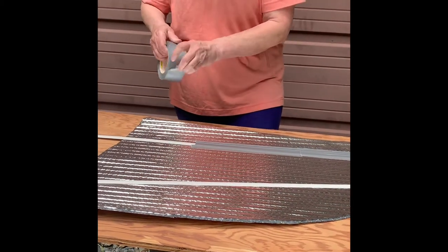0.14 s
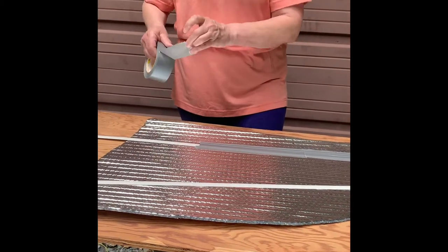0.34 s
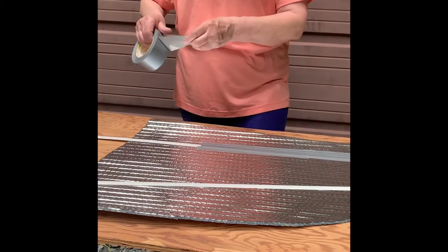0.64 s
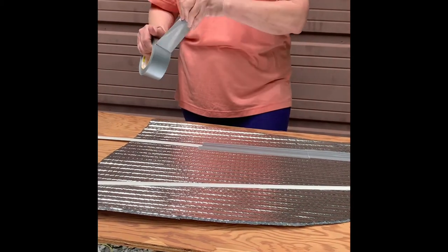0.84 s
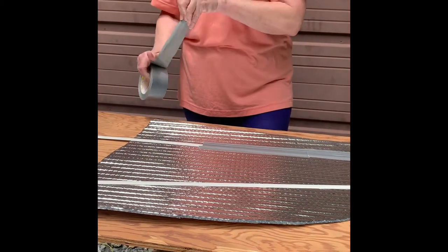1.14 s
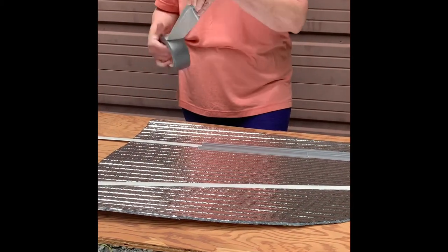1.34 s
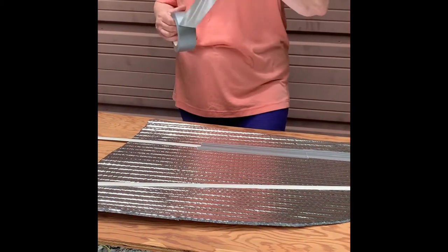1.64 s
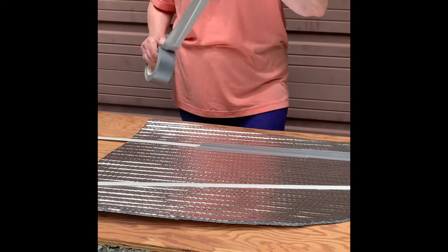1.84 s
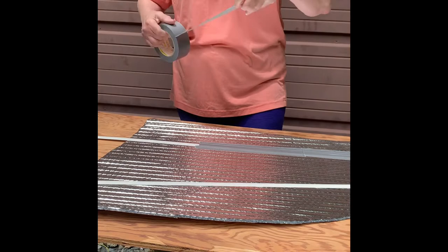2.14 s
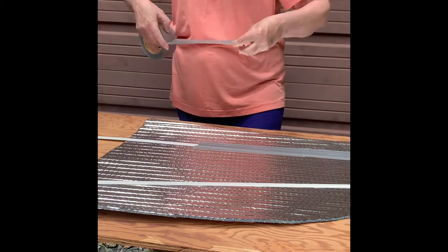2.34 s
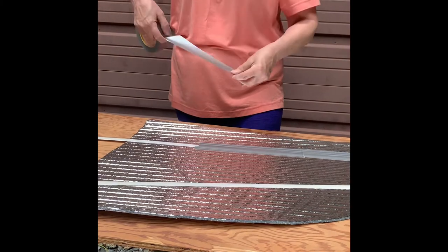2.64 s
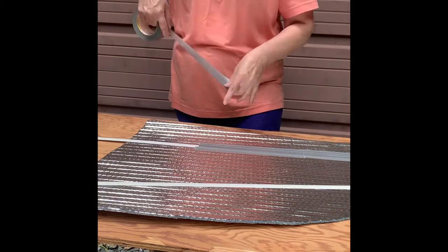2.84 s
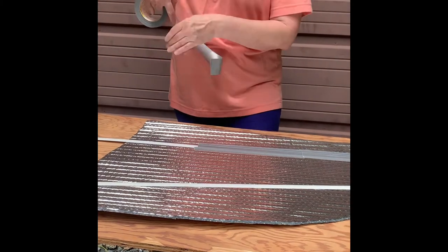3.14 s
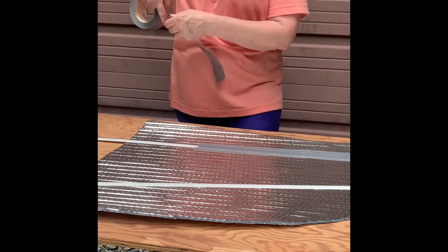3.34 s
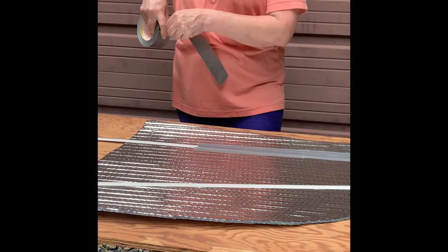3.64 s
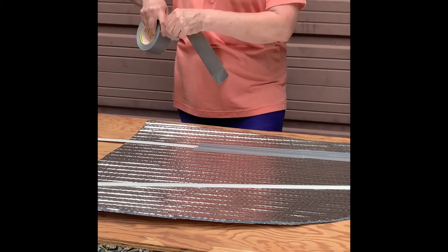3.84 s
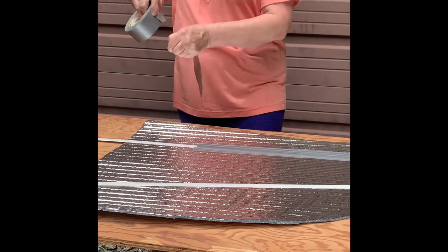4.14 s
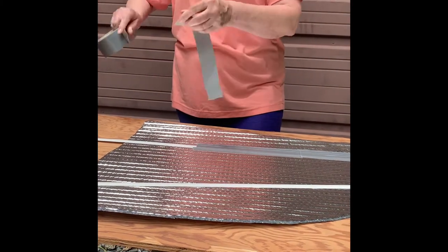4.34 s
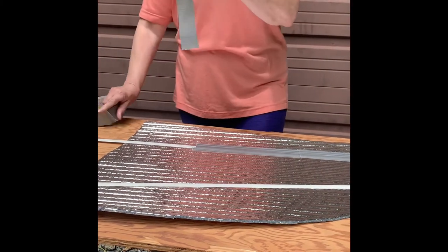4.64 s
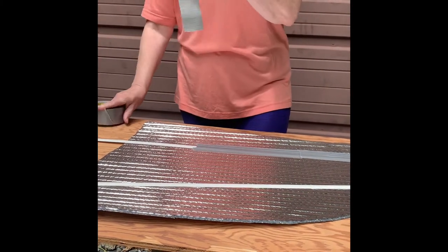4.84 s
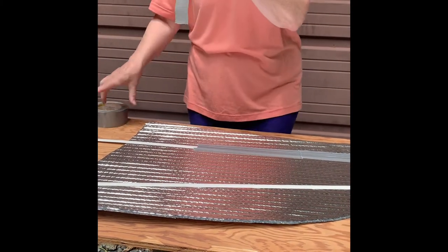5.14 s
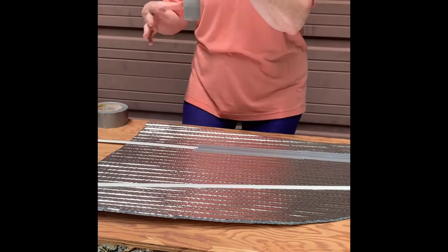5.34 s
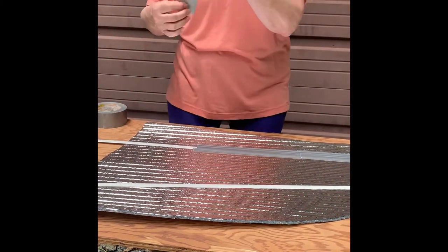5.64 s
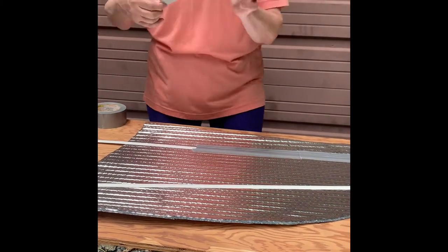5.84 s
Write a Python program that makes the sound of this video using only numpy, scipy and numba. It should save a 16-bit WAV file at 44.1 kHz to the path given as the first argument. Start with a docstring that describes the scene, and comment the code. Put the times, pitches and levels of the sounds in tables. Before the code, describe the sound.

At a table before a wall, a short tape pull is followed by two louder, very brief rips that crack as the strip snaps taut. After quiet handling and tiny crisp pops, the tape is torn across in a fraction of a second. The cardboard roll lands on wood with a low hollow knock, rocks and scuffs, then sticky film crackles softly. Close, fairly dry stereo, with faint low hum throughout.

```python
"""Duct tape off the roll

Close to a stereo pair, tape is jerked off its roll in three short pulls, crinkles in the fingers and is torn
across: stick-slip cracks through moving resonances. The roll is put down on a wooden table in front of a wall
and rocks before it settles: low-passed pushes drive the modes of wood and cardboard.
Far off, a motor hums throughout as a few harmonics, and faint high notes ring as wavering sines."""
import sys
import numpy as np
from scipy import signal
from scipy.fft import rfft, irfft, next_fast_len
from scipy.io import wavfile
from scipy.ndimage import uniform_filter1d
from numba import njit

SR = 44100
rng = np.random.default_rng(int(sys.argv[2]) if len(sys.argv) > 2 else 0)


def inscribe(sig):
    """Save sig as 16-bit PCM at rate SR to the path in sys.argv[1].

    A 1-D sig is mono; a 2-D sig holds one channel per row.
    Samples are clipped to [-1, 1] before scaling.
    """
    pcm = np.round(np.clip(np.atleast_2d(sig).T, -1, 1) * 32767)
    wavfile.write(sys.argv[1], SR, pcm.astype(np.int16))


N = 264159
TIME = np.arange(N) / SR

# All levels are relative within their layer; layer gains follow in the functions.
# Every ..._COLOUR is a noise spectrum: [f/Hz, density/dB per Hz]

# DISTANT: air ahead of the pair, and ambience from all around
AIR_COLOUR = [(20, -21), (60, -2.5), (110, 3), (170, -1.5), (300, -12), (600, -11), (1000, -14),
              (2000, -33), (4000, -36.5), (8000, -39.5), (14500, -46.5), (16000, -57)]
AMBIENT_COLOUR = [(100, -2), (300, -3), (700, 2), (1100, -1), (2000, -16.5), (3500, -24), (5500, -46)]
# the far motor's fundamental: [t/s, f/Hz]
MOTOR_PITCH = [(0.0, 102.5), (0.43, 103), (0.98, 108), (1.27, 108.5), (1.59, 99), (1.78, 101), (1.92, 96),
               (3.15, 101), (3.31, 100.0), (4.5, 102.5), (5.4, 109), (5.99, 108.5)]
# its swell: [t/s, level/dB]
MOTOR_SWELL = [(0, -4.5), (1.2, -0.5), (2, -3), (3.9, 0), (4.5, 3.5), (5.99, 0.5)]
# its harmonics: [multiple of the fundamental, level/dB]
MOTOR_ORDERS = [(1, -57), (2, -68.5), (3, -70.5)]
# far ringing notes: [start t/s, hold/s, f/Hz, level/dB, pitch wobble as a share]
FAR_NOTES = [(3.613, 0.36, 2406, -76.5, 0.005), (3.748, 0.14, 2023, -68, 0.003),
             (3.869, 0.15, 3440, -67, .003), (3.982, 0.18, 3050, -67, 0.004)]
NOTE_ATTACK_S, NOTE_FADE_DB_PER_S = 0.028, 111

# CLOSE, hands: fingers slide over the tape: [peak t/s, rise/s, fall/s, level/dB]
FINGER_STROKES = [(0.013, 0.086, 0.17, -64), (0.568, 0.074, 0.097, -66), (0.997, 0.029, 0.099, -65),
                  (2.672, 0.022, 0.15, -62), (2.749, 0.048, 0.068, -68), (3.357, 0.019, 0.031, -67.5),
                  (4.262, 0.034, 0.022, -49), (4.899, 0.064, 0.059, -57), (5.247, 0.05, 0.082, -59),
                  (5.608, 0.047, 0.059, -56.5), (5.64, 0.016, 0.1, -56.5), (5.742, 0.015, 0.035, -46.5),
                  (5.875, 0.29, 0.22, -64)]
FINGER_COLOUR = [(500, 0.5), (1500, -9.5), (3500, 5.5), (6500, -2.5), (9000, -7), (12000, -7),
                 (16000, -9.5)]
# hands and sleeves rub: [peak t/s, rise/s, fall/s, level/dB]
SLEEVE_STROKES = [(.02, 0.38, 0.42, -65.5), (.37, 0.21, 0.34, -61), (.64, 0.31, 0.6, -59),
                  (4.55, 0.93, 3.06, -64.5), (5.88, 0.57, 0.36, -61.5)]
RUB_COLOUR = [(100, -17), (300, 5.5), (700, 8), (1700, 4), (2600, -12.5), (5000, -26)]
# soft treble swishes: [peak t/s, rise/s, fall/s, level/dB]
SWISHES = [(1.28, 0.37, 0.33, -69), (1.425, 0.047, 0.039, -72.5), (1.99, .2, .25, -78),
           (2.2, 0.11, .16, -71.5)]
SWISH_COLOUR = [(2000, -20), (4000, -7.5), (6500, -2.5), (11000, -1), (15000, 3.5)]

# CLOSE, tape: a gentle pull off the roll and two hard ones:
# [t/s, length/s, attack/s, level/dB, sag/dB, final jerk/dB, top slip rate/(1/s), final resonance f/Hz]
PULLS = [(0.12, 0.087, 0.022, -28, 10.5, -4, 650, 2100), (1.014, 0.043, .012, -28.5, 7, 7.5, 786, 2340),
         (1.6894, .057, .008, -27.5, 12, 14.5, 800, 7500)]
GENTLE_COLOUR = [(150, -11), (350, -5.5), (550, 4), (850, 5.5), (1300, -8), (1900, 3.5), (3000, 3),
                 (6000, 4), (9000, 0), (12000, -0.5), (16000, -1)]
PULL_COLOUR = [(80, -22), (250, 1), (550, -2.5), (900, -9), (1400, -0.5), (2100, -2), (3500, 4),
               (5000, -4.5), (8500, -3), (11000, -6), (16000, -5)]
GRAB_S, GRAB_BELOW_DB = 0.0044, 6.5  # the glue starts to part at once, a little under the full level
JERK_S, RELEASE_S, RELEASE_DB = 0.016, 0.003, 21.5  # the strip comes taut, then the peeling stops
START_SPEED, JERK_SPEED = 0.4, 0.6  # shares of the top slip rate
SLACK_HZ, RESONANCE_HZ_PER_SLIP_RATE = 1300, 3.2  # the resonance climbs with the peeling speed
BOOM_START_HZ, BOOM_END_HZ, BOOM_GLIDE_S = 720, 490, 0.019  # lower as the freed strip lengthens
BOOM_DB, BOOM_RISE_S, BOOM_FALL_S = 12, 0.04, 0.022
# cracks as the glue lets go and the strip jerks: [t/s, level/dB, hump f/Hz]
CRACKS = [(.1177, -35.5, 4016), (.1412, -28.5, 6530), (1.011, -26, 2800), (1.0172, -24.5, 3270),
          (1.0372, -24.5, 3470), (1.0535, -20, 8000), (1.0567, -16, 2050), (1.0613, -14, 11000),
          (1.688, -25, 1400), (1.6937, -23.5, 5000), (1.7435, -27.5, 10000), (1.7471, -18.5, 8000),
          (1.7502, -16.5, 7600)]
# the strip snaps taut and twangs: [t/s, crack level/dB, hump f/Hz, twang level/dB, twang f/Hz, twang t60/s]
TAUT = [(0.206, -42, 2100, -29.5, 227, 0.096), (1.0605, -10, 2050, -23.5, 263, 0.048),
        (1.7599, -9, 2700, -28, 233, 0.03)]
SNAP_COLOUR = [(100, -20.5), (400, 4.5), (900, -5), (1400, -3), (2100, 3.5), (3500, 4.5), (5000, 5),
               (9000, -2), (12000, -2.5), (16000, -5)]
TWANG_LAG_S = 0.0017
TWANG_OVERTONE, OVERTONE_DB, OVERTONE_T60_S = 1.8, -5, 0.012  # second mode, as a multiple of the first
# fingertips tap the cardboard core: [t/s, level/dB, hump f/Hz]
TAPS = [(.52, -43, 240), (.538, -46.5, 360), (.619, -49, 354), (.9325, -48, 1393), (2.949, -52.5, 1530),
        (3.316, -56, 1550), (4.5127, -43, 1494)]
TAP_COLOUR = [(100, -13), (500, 5), (1200, 0.5), (2500, -10.5), (5000, -18), (16000, -26.5)]
# the loudest creases popping in the handled strip: [t/s, level/dB, hump f/Hz]
CRINKLES = [(.936, -64, 9000), (.9655, -61.5, 9400), (.9784, -62, 9020), (1.6437, -46.5, 5200),
            (2.668, -41.5, 12950), (2.692, -44.5, 3250), (2.7435, -54, 3420), (2.7505, -54, 3250),
            (2.756, -51, 3350), (2.7645, -51, 3960), (2.8535, -52.5, 3576), (2.877, -50, 3230),
            (2.949, -53.5, 3480), (3.054, -53, 2086), (3.103, -45, 2800), (3.316, -59.5, 2720),
            (3.3543, -61.5, 2086), (3.551, -52, 3750), (4.2635, -42.5, 9020), (4.408, -61.5, 9000),
            (4.5127, -44.5, 2576), (5.5884, -59.5, 6110), (5.5922, -53.5, 5900), (5.6042, -49, 6020),
            (5.6104, -50, 5970), (5.6345, -42, 5400), (5.6405, -55, 14500), (5.6754, -63, 11100),
            (5.6935, -54.5, 3450), (5.7359, -39, 5020), (5.7452, -41, 10700), (5.8262, -61, 2500),
            (5.9254, -55.5, 3770), (5.931, -59, 3400)]
CRINKLE_COLOUR = [(60, -23), (300, -9), (1200, 7), (2200, 0), (3500, 0.5), (6000, 1.5), (10000, -5),
                  (16000, -7)]
CREASE_ABOVE_DB, CREASE_SPREAD_DB, CREASE_HZ = 1.5, 2.5, 5244  # small creases at random around a stroke
# the tear advances in surges: [peak t/s, rise/s, fall/s, level/dB]
SURGES = [(4.0632, 0.036, 0.0024, -21.5), (4.0682, .002, 0.047, -27.5), (4.0875, 0.007, 0.012, -24),
          (4.0962, 0.006, 0.0028, -26)]
# single threads crack in the tear: [t/s, level/dB, hump f/Hz]
THREADS = [(4.0208, -39.5, 3000), (4.0352, -30, 2485), (4.0467, -26, 2500), (4.0612, -20, 6500),
           (4.0632, -12.5, 6500), (4.0673, -24.5, 12000), (4.0876, -25, 9000), (4.0906, -12, 10000),
           (4.094, -25.5, 13000), (4.0963, -18, 6440)]
TEAR_COLOUR = [(150, -15), (400, -10.5), (620, -1.5), (1200, -7.5), (2500, -7), (4000, -3), (7000, -8.5),
               (9000, -4), (11000, -8.5), (16000, -11.5)]
TEAR_START_S, TEAR_END_S, THREADS_PER_S = 4.02, 4.099, 460
TEAR_START_HZ, TEAR_END_HZ = 1982, 9700  # the resonance rises as the intact part narrows

# CLOSE, table: the roll lands, rocks and settles: [t/s, table level/dB, roll level/dB, cut-off f/Hz]
TOUCHES = [(4.5737, -19.5, -21, 3240), (4.576, -26.5, -26, 3570), (4.579, -21.5, -32, 1500),
           (4.5833, -16.5, -16.5, 745), (4.59, -17.5, -33, 168), (4.601, -25.5, -31, 300),
           (4.735, -41.5, -36.5, 1600), (4.7436, -19.5, -29, 225), (4.755, -26, -40, 201),
           (4.771, -36.5, -44, 1020), (4.78, -25, -46, 240), (4.801, -39, -44, 243),
           (4.944, -30, -44, 181.5), (5.042, -42, -36.5, 1180), (5.058, -31.5, -22, 1310),
           (5.063, -22, -38, 206), (5.0717, -27.5, -19, 1130), (5.083, -34, -37, 1180),
           (5.0945, -28, -36, 400), (5.191, -57, -44.5, 1198)]
# modes of the table top, then of the roll: [f/Hz, level/dB, t60/s]
TABLE_MODES = [(60.4, -19, 0.48), (97.3, -14, 0.53), (130.8, -10, 0.2), (165.4, -5, 0.13),
               (192.7, -10.5, 0.14), (244.3, -1.5, 0.15), (291, -14, 0.05), (396, -9.5, 0.086),
               (433, -12.5, 0.051)]
ROLL_MODES = [(533, -10, 0.098), (650, -18, 0.088), (830, -7, 0.023), (1098, -4, 0.063),
              (1296, -8.5, 0.033), (1530, -35, 0.068), (1986, -23, 0.03), (2330, -40, 0.03)]
CLATTER_COLOUR = [(30, -20), (70, -0.5), (150, 5.5), (200, -2), (260, 1.5), (400, 0.5), (560, 2), (750, -2),
                  (1150, -6.5), (1800, -8), (2800, -21.5), (8000, -38)]
KNOCK_HIGHPASS_HZ = 68.5  # the knocks are cut gently below this
# the sticky edge rasps on the wood: [t/s, level/dB]
RASPS = [(4.574, -43), (4.73, -54.5), (4.768, -58.5), (5.053, -55.5)]
GRIT_COLOUR = [(500, 1), (2500, 0.5), (4000, -0.5), (7000, -9.5), (10000, -8.5), (16000, -20)]
GRIT_LAG_S, GRIT_RISE_S, GRIT_FALL_S = 0.0048, 0.016, 0.083
# the roll scuffs under the hand: [peak t/s, rise/s, fall/s, level/dB]
SCUFFS = [(4.63, .03, 0.22, -35), (4.785, 0.095, 0.032, -34.5), (4.96, 0.12, 0.28, -46),
          (5.095, 0.28, 0.041, -37.5), (5.24, 0.16, 0.28, -67)]
SCUFF_COLOUR = [(25, -16.5), (65, 1.5), (100, 5.5), (155, -1.5), (200, 0), (250, 1), (400, -25.5),
                (900, -19), (2000, -58.5)]

# PLACE: colours of the wall's reflections, of those from the sides, and of the tail
NEAR_COLOUR = [(100, 2.5), (600, 3.5), (3000, -2.5), (7000, -4.5), (16000, -5.0)]
SIDE_COLOUR = [(140, -21.0), (290, -2.0), (550, 1), (1100, -4), (3000, -1.5), (5000, -10.0), (16000, -7.0)]
TAIL_COLOUR = [(100, -2.0), (1000, 1.5), (3000, 1.0), (6500, -0.5), (10000, -8.5), (16000, -8.5)]

# MICROPHONE: phase between the channels: [f/Hz, half turns by which left leads]
PAIR_PHASE = [(0, 0), (1500, 0), (2400, .28), (3600, .33), (4450, 1), (5100, 1), (6500, 2), (7550, 2),
              (8400, 3), (9500, 3), (10400, 4), (11600, 4), (12600, 5), (13700, 5), (14600, 6)]
CUTOFF_HZ = 15900


def from_db(db):
    """Decibels to gain."""
    return 10 ** (np.asarray(db) / 20)


def unit_energy(x):
    """Scale so that the squares sum to one."""
    return x / np.sqrt(np.sum(x ** 2) + 1e-20)


def in_time(rows):
    """Each column of a curve, interpolated at every sample."""
    s, *columns = np.transpose(rows)
    return [np.interp(TIME, np.sort(s), column) for column in columns]


def add(out, s, sound):
    """Mix a sound in at a time in seconds."""
    at = max(round(s * SR), 0)
    out[at:at + len(sound)] += sound[:N - at]


def colour(x, spectrum, peak_hz=1000, peak_db=0, size=4096):
    """Causal filter with a given spectrum and a broad hump; white noise keeps its power."""
    hz, db = np.transpose(spectrum)
    octave = np.log2(np.maximum(np.fft.rfftfreq(size, 1 / SR), 10))
    hump = np.exp(-2 * (octave - np.log2(peak_hz)) ** 2)
    log_gain = np.log(from_db(np.interp(octave, np.log2(hz), db) + peak_db * hump))
    # folding the cepstrum onto positive times gives minimum phase
    cepstrum = irfft(log_gain)[:size // 2]
    cepstrum[0] = 0
    response = unit_energy(irfft(np.exp(rfft(2 * cepstrum, size))))
    return signal.oaconvolve(x, response)[:len(x)]


def drift(rate):
    """Random curve of about unit spread, rate points per second; it holds still after 4096 points."""
    return np.interp(TIME * rate, np.arange(4096), rng.standard_normal(4096))


def dying_noise(t60, size=4096):
    """A burst of noise with unit energy that falls 60 dB in t60 seconds."""
    return unit_energy(rng.standard_normal(size) * from_db(-60 * TIME[:size] / t60))


def ring(x, hz, t60):
    """A damped mode: a unit click sets a sine of height one ringing."""
    r, w = from_db(-60 / (t60 * SR)), 2 * np.pi * hz / SR
    return signal.lfilter([0, np.sin(w)], [1, -2 * r * np.cos(w), r * r], x + 1e-18)


def struck(force, modes):
    """A body answers a force with its modes, in alternating sign."""
    return sum((-1) ** k * from_db(db) * ring(force, hz, t60) for k, (hz, db, t60) in enumerate(modes))


@njit
def moving_resonance(x, hz, q):
    """Band-pass with a gliding centre and a gain of one on top."""
    out, y1, y2 = np.zeros(len(x)), 0., 0.
    for i in range(2, len(x)):
        w = 2 * np.pi * hz[i] / SR
        r = np.exp(-w / (2 * q))
        y = (1 - r * r) / 2 * (x[i] - x[i - 2]) + 2 * r * np.cos(w) * y1 - r * r * y2 + 1e-18
        out[i], y2, y1 = y, y1, y
    return out


def strokes(rows):
    """Gain of overlapping strokes; each swells by 20 dB over its rise and dies by 20 dB over its fall."""
    power = np.zeros(N)
    for s, rise, fall, db in rows:
        distance = np.maximum((s - TIME) / rise, (TIME - s) / fall)
        power += from_db(db - 20 * np.minimum(distance, 10)) ** 2
    return np.sqrt(power)


def air():
    """Steady coloured noise from ahead, its level barely drifting."""
    return from_db(-58.0 + 0.27 * drift(2.9)) * colour(rng.standard_normal(N), AIR_COLOUR)


def ambience():
    """Coloured noise, opposed in the two channels so that it surrounds the pair."""
    return from_db(-64.5) * colour(rng.standard_normal(N), AMBIENT_COLOUR) * [[1], [-1]]


def motor(waver_db, wobble):
    """A far engine whose speed wanders and whose harmonics fade in and out."""
    hz = in_time(MOTOR_PITCH)[0] * (1 + wobble * drift(12))
    phase = 2 * np.pi * np.cumsum(hz) / SR
    swell_db = in_time(MOTOR_SWELL)[0]
    hum = np.zeros(N)
    for multiple, db in MOTOR_ORDERS:
        level_db = db + swell_db + waver_db * drift(5.6)
        hum += from_db(level_db) * np.sqrt(2) * np.sin(multiple * phase)
    return hum


def friction(rows, spectrum, grain_db, grains_per_s, clump_db=-3.5):
    """Sliding contact that catches and lets go in grains, which come in clumps."""
    grain_level_db = grain_db * drift(grains_per_s) + clump_db * drift(grains_per_s / 10)
    grains = from_db(grain_level_db) * rng.standard_normal(N)
    return strokes(rows) * colour(grains / grains.std(), spectrum)


def hands():
    """Grainy friction of fingers on tape, of hands and sleeves, and soft swishes."""
    out = friction(FINGER_STROKES, FINGER_COLOUR, grain_db=6.5, grains_per_s=1100, clump_db=3.0)
    out += friction(SLEEVE_STROKES, RUB_COLOUR, grain_db=4.0, grains_per_s=210, clump_db=-0.66)
    return out + friction(SWISHES, SWISH_COLOUR, grain_db=2.0, grains_per_s=450, clump_db=2.0)


def rip(course, spectrum, jitter, uneven_db, slip_t60, fizz, crack, resonance, q, wander, count=4):
    """Stick and slip: each jump of the ripping edge is a tiny crack, over the fizz of parting glue strands."""
    level_db, rate, hz, sounding = course
    cycle = np.floor(np.cumsum(rate * np.exp(jitter * drift(400))) / SR)
    unevenness = np.clip(rng.standard_normal(N), -2, 2)
    slips = np.diff(cycle, prepend=0) * from_db(2 * uneven_db * unevenness)
    slips /= np.abs(uniform_filter1d(slips, size=600)) + 1e-9  # mean power of one
    fade = from_db(-120 / (slip_t60 * SR))  # a power, so 60 dB in t60
    spray = signal.lfilter([1 - fade], [1, -fade], slips + 1e-18)
    cracks = crack * np.sqrt(slips) + np.sqrt(spray + fizz ** 2) * rng.standard_normal(N)
    cracks = colour(cracks, spectrum) * from_db(level_db) * sounding
    out = cracks + resonance * moving_resonance(cracks, hz, q)
    for centre in np.geomspace(1800, 9000, num=count):  # sharp creases ring and wander as the strip flexes
        crease_hz = centre * np.exp(wander * np.clip(drift(50), -2, 2))
        out += 2 * moving_resonance(cracks, crease_hz, 16.0)
    return out


def pull_course(s, length, attack, db, sag_db, jerk_db, rate, final_hz):
    """A pull grabs, speeds up, sags in level and ends in a jerk: level/dB, slips per s, f/Hz, sounding."""
    end, running_hz = s + length, RESONANCE_HZ_PER_SLIP_RATE * rate
    start_rate, jerk_rate = START_SPEED * rate, JERK_SPEED * rate
    low_db = db - sag_db
    curves = in_time([(s, db - RELEASE_DB, start_rate, SLACK_HZ),
                      (s + GRAB_S, db - GRAB_BELOW_DB, start_rate, SLACK_HZ),
                      (s + attack, db, jerk_rate, (SLACK_HZ + running_hz) / 2),
                      ((s + attack + end - JERK_S) / 2, db - sag_db / 2, rate, running_hz),
                      (end - JERK_S, low_db, rate, running_hz),
                      (end, low_db + jerk_db, jerk_rate, final_hz),
                      (end + RELEASE_S, low_db - RELEASE_DB, start_rate, final_hz)])
    return curves + [(TIME > s) & (TIME < end + RELEASE_S)]


def with_boom(ripping):
    """The freed strip adds a low resonance that sinks and is strongest at the height of each pull."""
    out = ripping.copy()
    for s, _, attack, *_ in PULLS:
        hz = np.interp(TIME, [s, s + BOOM_GLIDE_S], [BOOM_START_HZ, BOOM_END_HZ])
        gain = strokes([(s + attack, BOOM_RISE_S, BOOM_FALL_S, BOOM_DB)])
        out += gain * moving_resonance(ripping, hz, 3.5)
    return out


def pulls():
    """Tape peels off the roll in slips, gently once and then hard twice."""
    ripping = rip(pull_course(*PULLS[0]), GENTLE_COLOUR, jitter=0.2, uneven_db=1.0, slip_t60=0.013,
                  fizz=0.32, crack=0.13, resonance=0.87, q=2.8, wander=0.24)
    for pull in PULLS[1:]:
        ripping += rip(pull_course(*pull), PULL_COLOUR, jitter=0.26, uneven_db=2.5, slip_t60=0.004,
                       fizz=0.74, crack=0.5, resonance=1.2, q=3.4, wander=0.22)
    return with_boom(from_db(-6.0) * ripping)


def pops(rows, spectrum, t60, peak_db, gain_db, ringing=0, q=7.7):
    """Sudden releases: an impulse with a short crackle behind it, each with its own pitch."""
    out = np.zeros(N)
    for s, db, hz in rows:
        burst = dying_noise(t60)
        burst[0] += 0.4
        burst = colour(burst, spectrum, hz, peak_db)
        burst += ringing * moving_resonance(burst, np.full(len(burst), float(hz)), q)  # it rings on
        add(out, s, from_db(db + gain_db) * unit_energy(burst))
    return out


def snaps():
    """Single cracks of parting glue and of the strip snapping taut."""
    rows = CRACKS + [row[:3] for row in TAUT]
    return pops(rows, SNAP_COLOUR, t60=0.0078, peak_db=5.0, gain_db=15.0, ringing=0.42, q=2.0)


def twangs():
    """The strip rings briefly like a drumskin, in two modes, when the pull stops."""
    out, t = np.zeros(N), TIME[:SR // 4]
    for s, _, _, db, hz, t60 in TAUT:
        overtone = (hz * TWANG_OVERTONE, db + OVERTONE_DB, OVERTONE_T60_S)
        for mode_hz, mode_db, mode_t60 in ((hz, db, t60), overtone):
            fading = from_db(mode_db - 60 * t / mode_t60)
            add(out, s + TWANG_LAG_S, fading * np.sin(2 * np.pi * mode_hz * t))
    return out


def taps():
    """Fingertips set the cardboard core ringing."""
    return pops(TAPS, TAP_COLOUR, t60=0.0086, peak_db=7.0, gain_db=18.0, ringing=4.4)


def small_creases(reach, octaves, count=3):
    """A few random creases around the height of each finger stroke: [t/s, level/dB, hump f/Hz]."""
    rows = []
    for s, rise, fall, db in FINGER_STROKES:
        for _ in range(count):
            at = min(s + reach * rng.uniform(-rise, fall), TIME[-1])
            level_db = db + CREASE_ABOVE_DB + CREASE_SPREAD_DB * rng.normal()
            rows.append((at, level_db, CREASE_HZ * 2 ** (octaves * rng.normal())))
    return rows


def crinkles():
    """Creases pop as the handled film buckles, and ring on."""
    rows = CRINKLES + small_creases(reach=0.33, octaves=0.17)
    return pops(rows, CRINKLE_COLOUR, t60=0.006, peak_db=11.0, gain_db=17.5, ringing=2.0)


def far_notes(flutter_db):
    """Thin tones start quickly, hold and die away, fluttering as by echoes on the way."""
    out = np.zeros(N)
    for s, hold, hz, db, wobble in FAR_NOTES:
        fade_db = NOTE_FADE_DB_PER_S * np.maximum(TIME - s - hold, 0)
        level_db = db - fade_db + flutter_db * np.clip(drift(110), -1.5, 1)
        swell = np.clip((TIME - s) / NOTE_ATTACK_S, 0, 1) * from_db(level_db)
        out += swell * np.sin(2 * np.pi * np.cumsum(hz * (1 + wobble * drift(200))) / SR)
    return out


def tear_course():
    """Threads part at a steady mean rate, louder in each surge: level/dB, threads per s, f/Hz, sounding."""
    level_db = 20 * np.log10(strokes(SURGES))
    hz = np.interp(TIME, [TEAR_START_S, TEAR_END_S], [TEAR_START_HZ, TEAR_END_HZ])
    return level_db, np.full(N, THREADS_PER_S), hz, (TIME > TEAR_START_S) & (TIME < TEAR_END_S)


def tear():
    """The tear crosses the strip thread by thread, with single loud threads on top."""
    ripping = rip(tear_course(), TEAR_COLOUR, jitter=0.3, uneven_db=0.5, slip_t60=0.0044,
                  fizz=0.51, crack=0.2, resonance=3.7, q=2.7, wander=0.21)
    return from_db(-10.5) * ripping + pops(THREADS, TEAR_COLOUR, t60=0.004, peak_db=13, gain_db=14.5)


def table(clatter_db, clatter_t60, roll_pan_db):
    """Each contact thumps the table and knocks the cardboard core, with a haze of dense short modes."""
    thump, knock, clatter = np.zeros((3, N))
    for s, table_db, roll_db, cut_hz in TOUCHES:
        contact = signal.butter(2, min(cut_hz, SR / 3), fs=SR, output="sos")
        push = signal.sosfilt(contact, signal.unit_impulse(4096))
        haze = signal.sosfilt(contact, dying_noise(clatter_t60, size=12000))
        add(thump, s, from_db(table_db) * push)
        add(knock, s, from_db(roll_db) * push)
        add(clatter, s, from_db(table_db) * haze)
    roll = struck(knock, ROLL_MODES) * from_db([[roll_pan_db], [-roll_pan_db]])
    return struck(thump, TABLE_MODES) + roll + from_db(clatter_db) * colour(clatter, CLATTER_COLOUR)


def grit():
    """The sticky edge of the roll drags a little on the wood after a landing."""
    rows = [(s + GRIT_LAG_S, GRIT_RISE_S, GRIT_FALL_S, db) for s, db in RASPS]
    return friction(rows, GRIT_COLOUR, grain_db=4.0, grains_per_s=440, clump_db=-2.0)


def scuffs():
    """The roll slides dully on the table under the hand."""
    return friction(SCUFFS, SCUFF_COLOUR, grain_db=4.5, grains_per_s=100)


def table_bounce(x, delay, gain, skew):
    """The table top mirrors the tape; the detour differs a little for the two microphones."""
    return np.array([x + gain * np.interp(TIME - delay * (1 + side * skew), TIME, x) for side in (-1, 1)])


def surroundings(x, near_db, near_t60, side_t60, far_db, far_t60, lumpy_db):
    """Quick reflections from the wall, then a faint, uneven tail; the low middle also comes from the sides."""
    near = colour(dying_noise(near_t60, size=SR), NEAR_COLOUR)
    sideways = colour(dying_noise(side_t60, size=SR), SIDE_COLOUR)
    far = colour(dying_noise(far_t60, size=SR), TAIL_COLOUR)
    far = unit_energy(far * from_db(lumpy_db * drift(63)[:SR]))
    echo = from_db(near_db) * (near + 0.67 * sideways * [[1], [-1]]) + from_db(far_db) * far
    delayed = np.pad(echo, ((0, 0), (SR // 400, 0)))  # 2.5 ms later than the direct sound
    return x + signal.fftconvolve(x, delayed, axes=1)[:, :N]


def microphone_pair(x):
    """The two channels drift apart in phase towards the treble; the right is slightly louder."""
    size = next_fast_len(N + SR // 10)
    lead = np.pi * np.interp(np.fft.rfftfreq(size, 1 / SR), *np.transpose(PAIR_PHASE))
    turned = rfft(x, size) * np.exp(0.5j * lead * [[1], [-1]])
    return irfft(turned, size)[:, :N] * from_db([[-0.2], [0.2]])


def scene():
    """Tape and table close by, motor, notes and air behind."""
    tape = pulls() + snaps() + twangs() + taps() + crinkles() + tear()
    # the tape's sounds are cut below 110 Hz
    tape = signal.sosfilt(signal.butter(2, 110, "high", fs=SR, output="sos"), tape)
    tape = table_bounce(tape, delay=0.0017, gain=0.33, skew=0.012)
    knocks = from_db(1.5) * table(clatter_db=22.5, clatter_t60=0.099, roll_pan_db=-0.5)
    knocks = signal.sosfilt(signal.butter(1, KNOCK_HIGHPASS_HZ, "high", fs=SR, output="sos"), knocks)
    knocks += grit() + scuffs()
    close = surroundings(tape + hands() + knocks, near_db=-13.5, near_t60=0.074, side_t60=0.045,
                         far_db=-25.5, far_t60=0.44, lumpy_db=2.5)
    distant = air() + ambience() + motor(waver_db=2.0, wobble=0.012) + far_notes(flutter_db=4.5)
    return microphone_pair(close + distant)


def record(dry):
    """The top of the treble is cut steeply."""
    return signal.sosfilt(signal.ellip(12, 0.1, 80, CUTOFF_HZ, fs=SR, output="sos"), dry)


dry = scene()
out = record(dry)
inscribe(out)
```